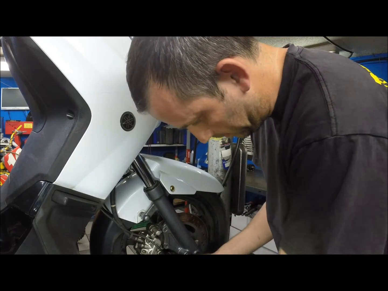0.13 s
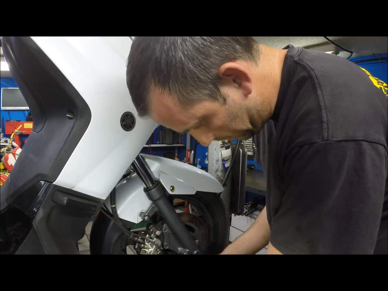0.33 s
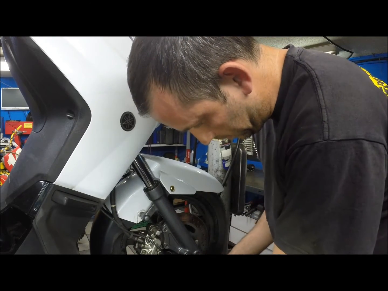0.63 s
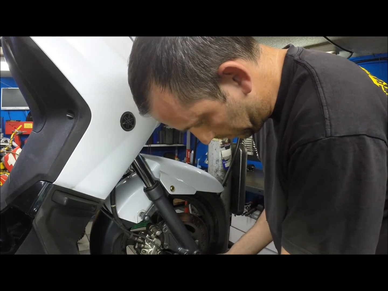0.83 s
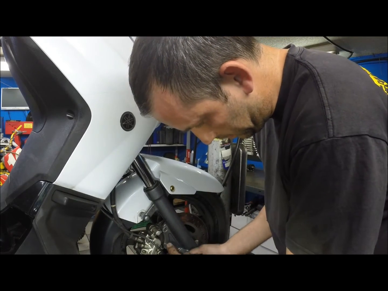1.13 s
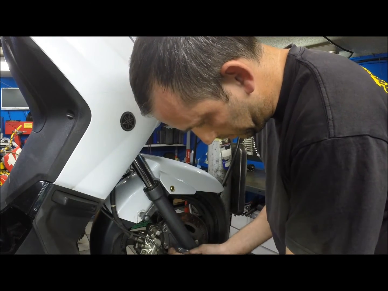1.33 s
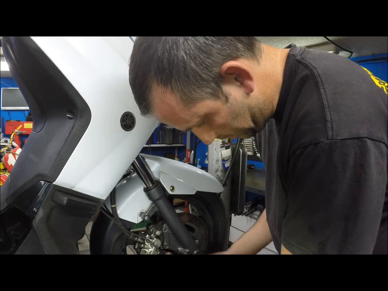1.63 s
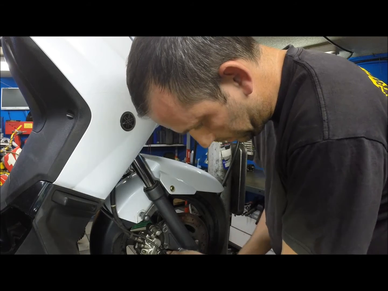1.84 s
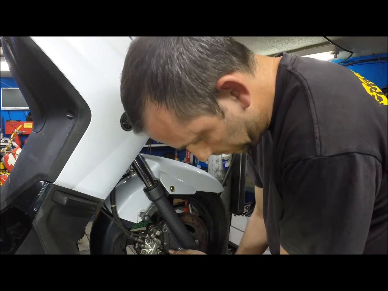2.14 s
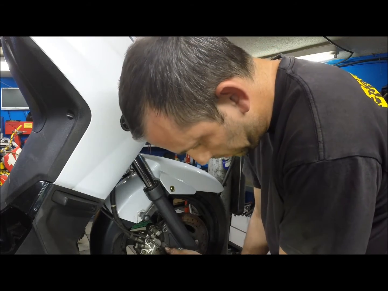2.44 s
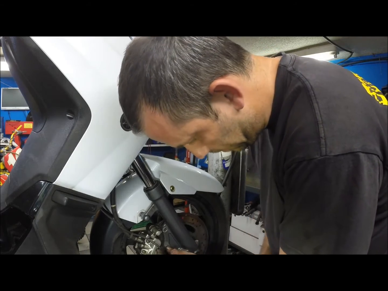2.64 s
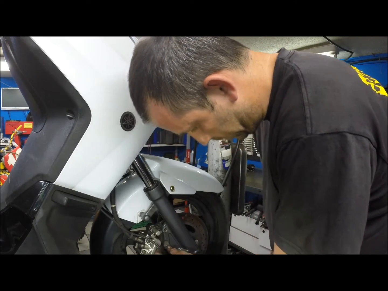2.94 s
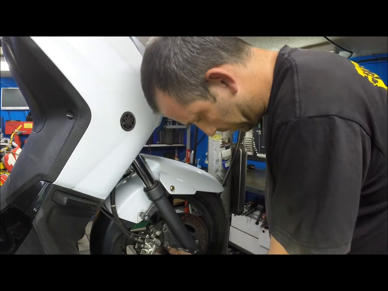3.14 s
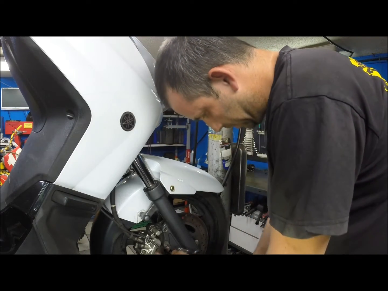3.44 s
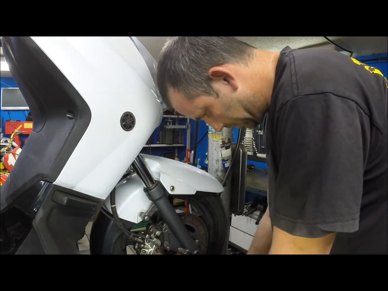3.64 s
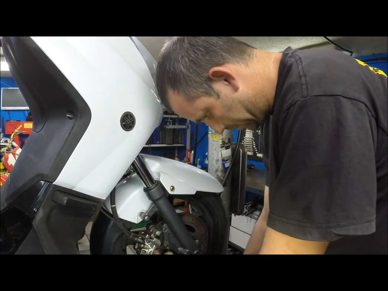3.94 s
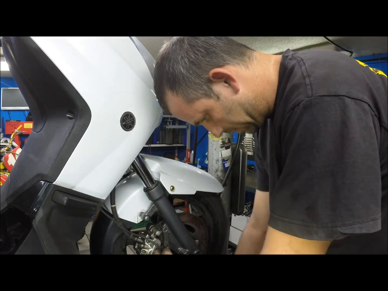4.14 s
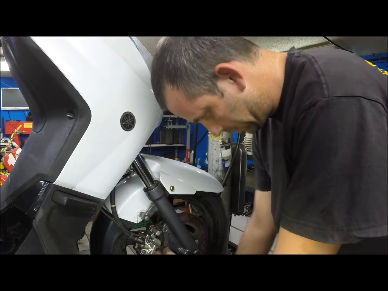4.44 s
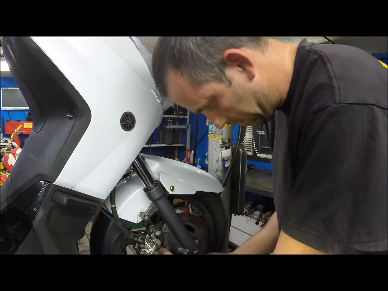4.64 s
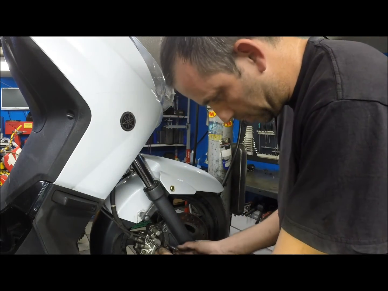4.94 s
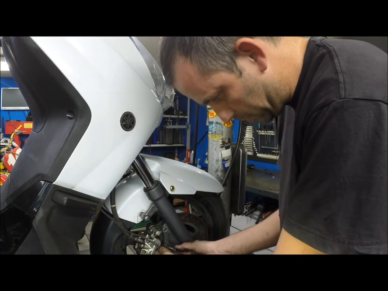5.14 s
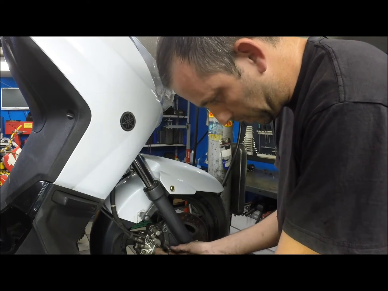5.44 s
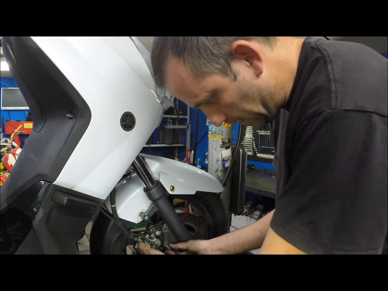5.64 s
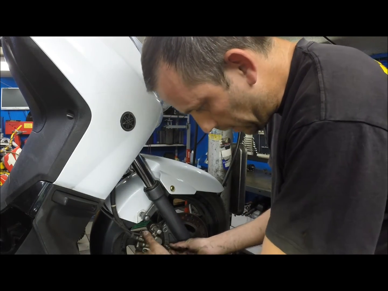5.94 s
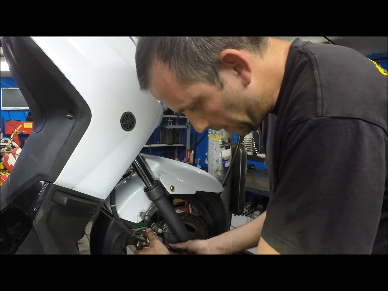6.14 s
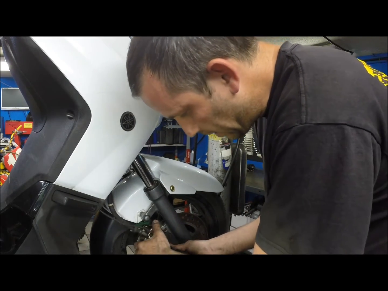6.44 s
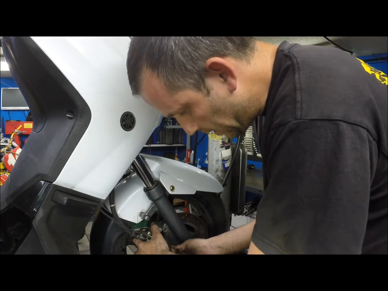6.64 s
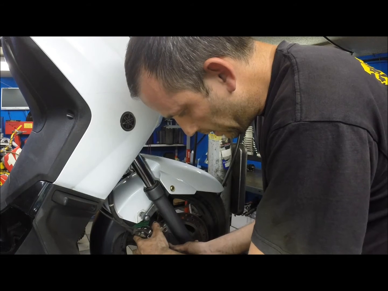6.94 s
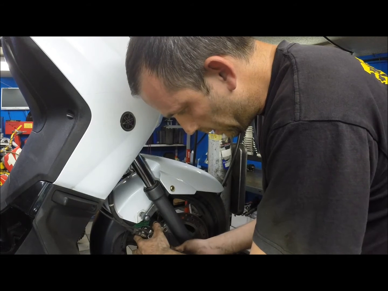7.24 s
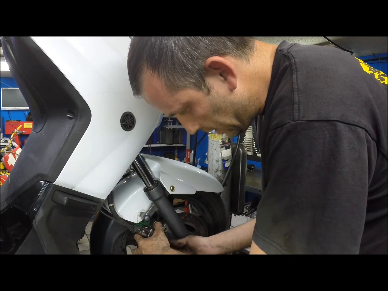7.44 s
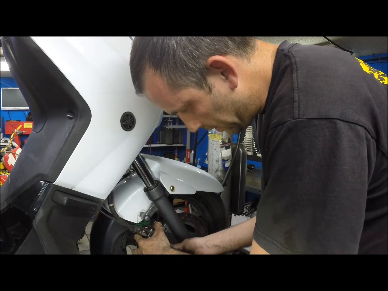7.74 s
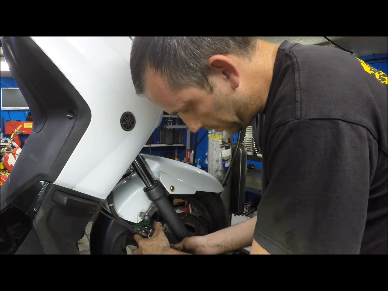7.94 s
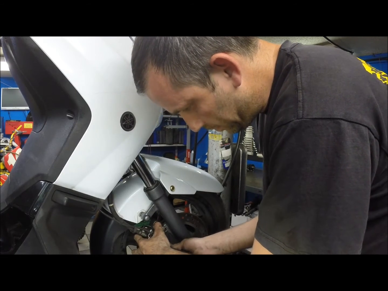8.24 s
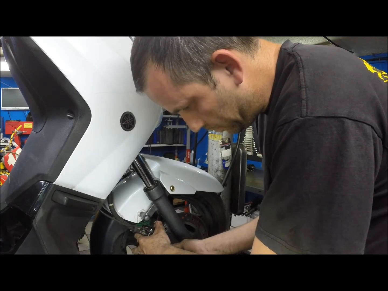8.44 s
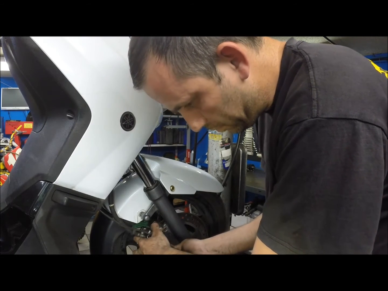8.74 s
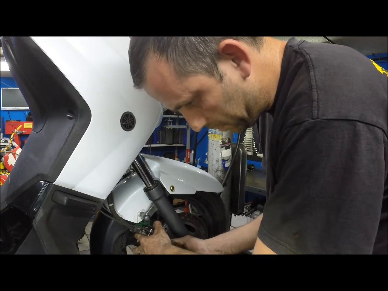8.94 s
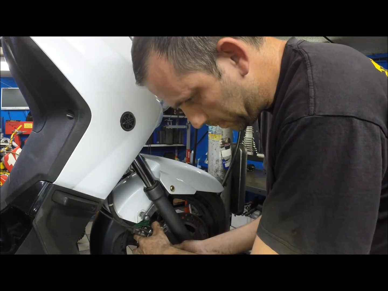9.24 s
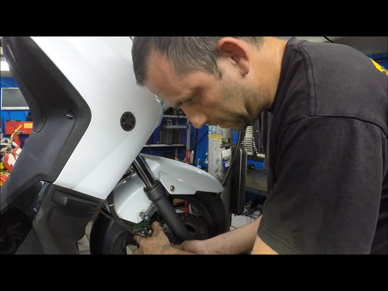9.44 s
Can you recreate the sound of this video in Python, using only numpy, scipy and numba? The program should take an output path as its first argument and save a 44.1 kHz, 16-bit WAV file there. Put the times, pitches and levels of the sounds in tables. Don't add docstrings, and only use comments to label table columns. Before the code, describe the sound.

Quiet workshop, microphone about a metre from the work, with soft room tone, faint hiss and a distant low motor hum swelling gently throughout. Barely audible taps at 0.4 and 0.9 s. At 1.5 s a bright steel ting on the brake disc, struck again just before 1.6 s, rings thin and high and is abruptly damped. Light knocks with dull wheel resonance at 1.9-2.7 s, firmer clacks at 2.9 and 3.1 s, then a pause with one faint tap at 4.5 s. From 5.2 to 5.7 s a busy run of metallic clanks, clip rattles and hollow thuds. The loudest, a heavy double clunk, lands at 6.5 s, followed by sharp knocks near 6.75 s and a softer one at 6.95 s. Small taps at 7.35 and 7.95 s; a clack at 8.7 s with a tiny scraping squeak; faint ticks around 9.4 s. Short diffuse echo follows the impacts.

```python
import sys
import numpy as np
from scipy import signal
from scipy.fft import rfft, irfft, next_fast_len
from scipy.io import wavfile
from scipy.ndimage import uniform_filter1d
from numba import njit

SR = 44100
rng = np.random.default_rng(int(sys.argv[2]) if len(sys.argv) > 2 else 0)


def ratio_of_db(decibels):
    return 10 ** (np.asarray(decibels, float) / 20)


def transcribe(signal):
    frames = np.atleast_2d(signal).T
    limited = np.clip(frames, -1, 1)
    pcm = np.round(limited * 32767).astype(np.int16)
    wavfile.write(sys.argv[1], SR, pcm)


N = 422786


def curve(table):
    s, *columns = np.transpose(table)
    return [np.interp(np.arange(N) / SR, s, column) for column in columns]


def add(out, s, sound):
    i = int(s * SR)
    out[i:i + len(sound)] += sound[:N - i]


def fade(t, t60, rise_s):
    rise = (1 - np.exp(-t / max(rise_s, 1e-5))) ** 2
    return rise * np.exp(-np.log(1000) * t / np.clip(t60, .01, 1.5))


def band(x, lo_hz, hi_hz, order=2):
    sos = signal.butter(order, [lo_hz, hi_hz], "bandpass", fs=SR, output="sos")
    y = signal.sosfilt(sos, x)
    return y / np.sqrt(np.mean(y ** 2))


def walk(rate):
    k = int(SR / rate)
    steps = np.repeat(rng.standard_normal(N // k + 1), k)
    return uniform_filter1d(uniform_filter1d(steps, k), k)[:N]


def coloured(gain_of_hz):
    size = next_fast_len(N)
    hz = np.maximum(np.fft.rfftfreq(size, 1 / SR), 1)
    y = irfft(rfft(rng.standard_normal(size)) * gain_of_hz(hz), size)[:N]
    return y / np.std(y)


@njit
def ring(pole, gain, size):
    out = np.zeros(size)
    for k in range(len(pole)):
        z = gain[k]
        for i in range(size):
            out[i] += z.imag
            z *= pole[k]
    return out


def body(t, hz, db, t60, chance, spot_db, drift):
    weight = ratio_of_db(db + spot_db * chance[0])
    weight = weight / np.sqrt(np.sum(weight ** 2))
    turn = 2j * np.pi * hz * (1 + drift * chance[1])
    decay = np.log(1000) / np.clip(t60, .03, 1.5)
    return ring(np.exp((turn - decay) / SR), weight * np.exp(3j * chance[2]), len(t))


# pitch_hz, density_db (per Hz)
FLOOR_SPECTRUM = [(12, -41), (20, -7), (80, -7), (97, -5.5), (125, -7), (160, -9), (184, -11.5), (224, -11),
                  (265, -14), (401, -16), (849, -20.5), (1030, -23), (1250, -24), (5160, -34), (15200, -47)]


def floor():
    hz, db = np.transpose(FLOOR_SPECTRUM)
    noise = coloured(lambda f: ratio_of_db(np.interp(np.log(f), np.log(hz), db)))
    low = uniform_filter1d(noise, size=81)
    high = noise - low
    return ratio_of_db(-65.5 + 4.0) * (low * ratio_of_db(1.3 * walk(2.34)) + high * ratio_of_db(.5 * walk(0.97)))


# start_s, pitch_hz
MOTOR_SPEED = [(0, 71.5), (1.1, 73.3), (2.8, 74.3), (4.6, 73.4), (5.9, 73), (6.6, 72), (7.5, 73.3),
               (8.6, 73.8), (8.95, 68.5), (9.59, 66.5)]
# start_s, level_db
MOTOR_THROB = [(0, -74), (.25, -62.5), (1.1, -59), (2.3, -61.5), (3.2, -66), (4.0, -69.5), (4.6, -72),
               (6.6, -67), (9.59, -66)]
# middle_s, length_s, level_db
HUM_SWELLS = [(0.422, 0.52, -67), (.8, 0.098, -81), (1.4, 0.94, -59), (2.373, 1.0, -55.5),
              (3.113, 0.13, -61.5), (3.524, 0.51, -64.5), (4.118, 0.34, -56.5), (4.526, 0.44, -63.5),
              (4.932, 0.19, -68), (5.19, .1, -62), (5.716, .66, -52.5), (6.19, 0.062, -66), (6.54, .3, -56),
              (6.835, 0.2, -57.5), (7.365, 0.52, -56), (7.745, 0.13, -64), (8.158, 0.34, -57),
              (8.538, 0.21, -59), (8.853, 0.15, -56), (9.15, 0.56, -64.5), (9.48, 0.14, -60.5)]


def motor():
    t = np.linspace(0, N / SR, num=N // 100)
    level = ratio_of_db(-73.5)
    for s, length_s, db in HUM_SWELLS:
        level = level + ratio_of_db(db) * np.exp(-np.abs(2 * (t - s) / length_s) ** 3.2)
    level = np.interp(np.arange(N) / SR, t, level) * ratio_of_db(0.91 * walk(16))
    speed_hz = curve(MOTOR_SPEED)[0] + 0.67 * walk(8.3)
    tone = np.sqrt(2) * level * np.sin(2 * np.pi * np.cumsum(speed_hz) / SR)
    throb = band(rng.standard_normal(N), 34.2, 40.8, order=1)
    return tone + ratio_of_db(curve(MOTOR_THROB)[0]) * throb


# low_edge_hz, high_edge_hz, t60_s, level_db
ECHO_BANDS = [(80, 560, 1, -3), (690, 1940, 0.91, -9.5), (1860, 7000, 0.93, -8.5), (4500, 22000, 0.42, -11)]


def room(x):
    t = np.arange(SR) / SR
    echo = np.zeros(SR)
    for lo_hz, hi_hz, t60, db in ECHO_BANDS:
        reflections = band(rng.standard_normal(SR), lo_hz, hi_hz) * np.sqrt((hi_hz - lo_hz) / t60)
        echo += ratio_of_db(db) * reflections * fade(t, t60, 0.0051)
    return signal.fftconvolve(x, echo * 4 / SR)[:N]


# start_s, length_s, level_db, pitch_hz
PAD_DRAGS = [(8.77, .1, -73.5, 2850), (8.77, 0.059, -72, 3230), (8.77, .08, -76, 3900),
             (8.77, .08, -73, 4700), (8.77, .05, -72, 5270), (8.775, .04, -71, 5750),
             (8.79, 0.042, -64, 1206), (8.94, .04, -77, 3100), (8.965, .065, -74, 3130),
             (8.97, .07, -81, 4700), (9.01, 0.042, -80, 3900), (8.97, .04, -79, 5750)]


def drags():
    waver_db, waver_hz = 5, 35
    out, grip, speed = np.zeros(N), ratio_of_db(waver_db * walk(200)), walk(90)
    for k, (s, length_s, db, hz) in enumerate(PAD_DRAGS):
        size = int(1.34 * length_s * SR)
        own = slice(k * SR // 2, k * SR // 2 + size)
        tone = np.sin(2 * np.pi * np.cumsum(hz + waver_hz * speed[own]) / SR)
        slide = signal.windows.tukey(size, .6)
        add(out, s - length_s / 8, ratio_of_db(db) * slide * grip[own] * tone)
    return out


# start_s, level_db, pitch_hz, t60_s
BOLT_PINGS = [(5.263, -67, 7200, 0.13), (1.53, -60, 12000, 0.11), (1.589, -55, 13430, .12),
              (5.546, -56, 4050, 0.2), (2.862, -62, 2830, 0.35), (2.861, -52.5, 1590, 0.32),
              (3.14, -55, 2377, 0.13), (5.672, -53.5, 6350, 0.14), (6.404, -66, 3750, .08),
              (6.406, -78, 4850, .2), (6.722, -65.5, 5670, 0.24), (6.811, -71, 5700, 0.13),
              (7.348, -66.5, 3800, 0.1), (5.67, -58, 2500, 0.24), (8.777, -68, 6860, 0.3),
              (5.72, -61, 4000, .4), (6.755, -59, 2800, 0.11)]
# start_s, level_db, pitch_hz, t60_s
PAD_RATTLES = [(1.528, -50, 5300, 0.085), (2.064, -59, 1440, 0.15), (2.1, -71, 7600, 0.046),
               (3.14, -61, 4300, 0.16), (8.678, -65, 3530, 0.11), (6.472, -41.5, 390, 0.25),
               (2.566, -56, 3950, 0.039), (2.86, -48, 1940, 0.19), (2.859, -62, 4500, 0.12),
               (3.14, -56, 875, 0.37), (4.5, -63, 970, .58), (4.516, -68, 3460, 0.43),
               (4.808, -58, 2600, .04), (5.263, -58.5, 4100, 0.15), (5.265, -66, 7500, .08),
               (5.382, -53.5, 7350, .076), (5.503, -64.5, 4100, .2), (5.671, -50, 4590, 0.29),
               (5.72, -49, 1680, 0.45), (5.72, -60.5, 4160, 0.4), (5.82, -52, 314, 0.27),
               (6.5, -32, 1530, 0.29), (8.678, -50.5, 735, 0.33), (8.775, -67, 5560, 0.34),
               (9.239, -56, 1450, 0.048), (9.432, -64, 1440, 0.2), (9.501, -67, 1450, 0.24),
               (5.68, -58, 3320, .3)]
# start_s, level_db, pitch_hz, t60_s
DRY_RATTLES = [(6.47, -48, 2190, .3), (6.499, -44, 2250, 0.37), (6.499, -52, 2870, .25),
               (6.499, -58, 3550, .25), (6.5, -37, 753, 0.48), (6.755, -52, 2430, 0.28),
               (5.647, -51, 2200, .35), (5.715, -52, 2200, .4), (5.546, -53, 2210, .3),
               (5.385, -54, 2240, 0.25), (5.34, -59, 2050, .4), (5.21, -56.5, 1500, .4),
               (5.21, -55.5, 700, .4), (8.68, -59.5, 2640, 0.23), (2.862, -63, 4260, .2),
               (1.528, -58, 4100, .15), (1.528, -58, 6100, .15), (1.528, -60, 8200, .15),
               (1.528, -60, 3400, .12), (1.589, -56, 7900, .05), (7.945, -62, 2800, .2),
               (7.945, -64, 3400, .25), (7.98, -62, 1400, .4), (7.34, -60, 1500, .3),
               (7.395, -60, 1450, .2), (6.946, -56, 1550, .2), (5.385, -60, 5200, .3),
               (5.67, -58, 5700, .3), (5.72, -60, 5600, .35), (8.68, -62, 3900, .25), (8.78, -66, 3600, .5),
               (9.44, -62, 1500, .4), (7.3, -60, 520, .4), (6.72, -52, 200, .5), (5.5, -62, 4000, .3)]


def ticks(pings, rattles):
    ping_width_hz, rattle_q = 110, 6.6
    out, t = np.zeros(N), np.arange(SR // 2) / SR
    rows = [(*row, ping_width_hz) for row in pings]
    rows += [(*row, row[2] / rattle_q) for row in rattles]
    for s, db, hz, t60, width_hz in rows:
        noise = rng.standard_normal(3 * SR // 5)
        rattle = band(noise, hz - width_hz / 2, hz + width_hz / 2)[-len(t):]
        add(out, s, ratio_of_db(db) * fade(t, t60, 0.00031) * rattle)
    return out


# pitch_hz, t60_s
STRIKE_TONES = [(7066, .37), (2896, .36), (3725, .19), (4780, .26), (2396, .2)]
# pitch_hz, t60_s
TOUCH_TONES = [(9324, .3), (11040, .17), (11890, .2), (12820, .15), (13430, .13)]
# pitch_hz, t60_s
BRUSHED_TONE = [(7075, .17)]
# start_s, then level_db of each of five modes
DISC_STRIKES = [
    (1.528, -31.5, -42, -68, -54, -55),
    (1.589, -41, -80, -51, -70, -80),
]
# start_s, first_tone_db, second_and_fourth_db, third_and_fifth_db
DISC_TOUCHES = [(1.5284, -57, -64, -53), (1.588, -49, -47.5, -53), (2.5677, -83, -84, -80),
                (5.3852, -64, -79, -80), (5.5463, -70, -67, -63), (5.6704, -65, -83, -63),
                (6.4044, -68, -96, -90), (6.498, -71, -90, -71), (8.6784, -82, -91, -79)]
# start_s, level_db, free_ringing_s
DISC_BRUSHES = [(1.3518, -72, 0.033), (2.5672, -69, 0.04), (2.86, -78, 0.036), (5.544, -44.5, 0.021),
                (5.6695, -56, 0.035), (6.4058, -59, 0.062), (6.4984, -63, 0.047), (6.5144, -58, 0.044),
                (6.7694, -69, 0.038), (7.265, -77, 0.036), (7.3474, -69, 0.056), (7.9424, -71, 0.043),
                (8.0314, -79, 0.023), (8.678, -61, 0.031), (8.776, -72, 0.049), (9.47, -75, 0.052)]
RETOUCHES = (1.5545, 1.5885)


def disc():
    hand_damps_s, fifth_tone_db, retouch_turns = 1.622, -12, .13
    out, t = np.zeros(N), np.arange(SR // 3) / SR
    touches = [(row[0], STRIKE_TONES, row[1:], hand_damps_s - row[0]) for row in DISC_STRIKES]
    touches += [(s, BRUSHED_TONE, [db], free_s) for s, db, free_s in DISC_BRUSHES]
    touches += [(s, TOUCH_TONES, (a, b, c, b, c + fifth_tone_db), .03) for s, a, b, c in DISC_TOUCHES]
    flutter = ratio_of_db(5.0 * walk(90))
    for s, tones, levels_db, free_s in touches:
        free = np.exp(-np.maximum(t - free_s, 0) / 0.00091)
        now = t + int(s * SR) / SR
        for k, ((hz, t60), db) in enumerate(zip(tones, levels_db)):
            strongest_struck = tones is STRIKE_TONES and k == 0
            contact = flutter[int(s * SR / 2) + k * SR:][:len(t)]
            held = (.14 if strongest_struck else .35) * contact
            slip = retouch_turns * sum(now > r for r in RETOUCHES) * strongest_struck
            tone = np.sin(2 * np.pi * (hz * now + slip))
            grip = contact if tones is BRUSHED_TONE else 1
            level = free * grip + (1 - free) * held
            add(out, s, ratio_of_db(db) * level * fade(t, t60, 0.000067) * tone)
    return out


# start_s, level_db, pitch_hz, t60_s
BLOW_MODES = [(1.5275, -43, 5300, .012), (1.527, -45, 4000, .012), (1.5278, -52, 6070, .015),
              (1.555, -56, 1560, 0.11), (5.646, -37, 1485, .1), (5.647, -45, 2450, 0.064),
              (5.6527, -38, 1590, .07), (5.67, -45, 4700, 0.046), (5.67, -47, 6800, .03),
              (5.715, -41, 1450, .1), (5.721, -39, 1793, 0.08), (5.715, -54, 2850, .06),
              (6.47, -26, 1450, 0.078), (6.473, -31, 1190, 0.16), (6.5, -23, 1460, 0.052),
              (6.503, -28, 930, 0.16), (6.506, -31, 1177, 0.22), (6.506, -25.5, 550, 0.085),
              (6.51, -35, 1739, .12), (6.57, -41, 500, 0.17), (6.722, -41, 703, 0.11),
              (6.755, -50, 1936, 0.14), (8.68, -46, 1450, .1), (2.862, -53, 2100, .1),
              (5.507, -46, 560, .12), (8.68, -47, 2170, 0.07), (8.685, -49, 760, 0.27),
              (8.679, -57, 3230, .07), (8.679, -64, 4300, .06), (2.064, -56, 1400, .1),
              (2.066, -56, 780, .15), (7.945, -54, 1200, .08), (3.17, -56, 535, .3),
              (6.505, -72, 12820, .25), (6.52, -76, 13430, .15), (1.918, -60, 540, .12),
              (.434, -60, 700, .08), (2.668, -60, 2000, .08), (1.6215, -52, 7300, .012)]


def blows():
    out, t = np.zeros(N), np.arange(SR // 3) / SR
    for s, db, hz, t60 in BLOW_MODES:
        add(out, s, ratio_of_db(db) * fade(t, t60, 0.00028) * np.sin(2 * np.pi * hz * t))
    return out


# pitch_ratio, level_db
WHEEL_MODES = [(1.002, -1.5), (0.858, -21), (0.931, -9), (1.039, -8), (1.117, -9.5), (1.24, -11),
               (1.38, -12.5)]
# start_s, thud_db, pitch_hz, boom_db
WHEEL_THUDS = [(0.434, -57, 539, -80), (0.9, -60, 529, -79), (1.917, -59, 531, -62.5),
               (2.064, -51, 657, -63), (2.475, -51.5, 631, -59.5), (2.674, -50.5, 654, -60),
               (2.863, -39, 544.5, -60), (3.143, -45, 529, -65), (4.498, -60, 530, -65.5),
               (5.207, -47.5, 537.5, -75), (5.264, -51.5, 541, -68), (5.395, -38, 540, -60.5),
               (5.507, -42, 545, -58.5), (5.553, -36.5, 531.5, -75), (5.65, -37, 637, -48.5),
               (5.67, -37.5, 611, -46), (5.714, -37.5, 595.5, -61.5), (6.472, -32.5, 600, -43),
               (6.484, -30, 470.4, -47), (6.49, -27, 495, -37), (6.725, -40.5, 638, -46),
               (6.753, -38.5, 526, -54.5), (6.946, -46, 667.5, -49.5), (7.36, -53, 516, -59),
               (7.403, -50.5, 528, -60.5), (7.956, -42, 540.6, -55), (8.032, -46.5, 530.4, -70),
               (8.681, -49.5, 523, -53.5), (8.846, -49.5, 508, -56.5), (9.436, -48.5, 538, -66)]


def thuds():
    wheel_hz, wheel_t60_s = 535, 0.36
    out, t = np.zeros(N), np.arange(SR // 3) / SR
    boom = band(rng.standard_normal(N), 130, 740) + 0.58 * band(rng.standard_normal(N), 211.5, 281)
    ratio, db = np.transpose(WHEEL_MODES)
    chance = rng.standard_normal((len(WHEEL_THUDS), 3, len(WHEEL_MODES)))
    chance[:, :2, 0] = 0
    for (s, thud_db, hz, boom_db), c in zip(WHEEL_THUDS, chance):
        t60 = wheel_t60_s * (wheel_hz / hz) ** 1.3
        modes = body(t, hz * ratio, db, t60 + 0 * ratio, c, spot_db=1.0, drift=0.01555)
        thud = modes * fade(t, 3.7, 0.0016)
        rumble = boom[int(.9 * s * SR):][:len(t)] * fade(t, 1.39 * t60, 0.0063)
        add(out, s - .003, ratio_of_db(thud_db) * thud + ratio_of_db(boom_db - 2) * rumble)
    return out


# pitch_hz, level_db, t60_s
FORK_MODES = [(877, -13, 0.14), (946, 3, 0.18), (1077, 7, 0.25), (1190, -5, 0.51), (1330, -23, 5.0),
              (1411, 21.5, 0.096), (1490, -16, 0.64), (1600, 2, 0.13), (1686, -1.5, 0.31), (1890, -13, 0.8),
              (1790, -30, 0.31), (1916, -1, 0.17), (2020, 18, 0.065), (2020, -2, 0.091), (2330, -31, 0.2),
              (2080, -19, 0.085), (2600, -23, 0.16), (2340, -52, 0.38)]
# pitch_hz, width_hz, level_db
CRACK_BANDS = [(2770, 660, 0), (3400, 950, -3.5), (3950, 790, -2.5), (4880, 1050, -6.5), (5720, 920, -10)]
# start_s, lower_clank_db, upper_clank_db, crack_db
FORK_KNOCKS = [(1.477, -61.5, -70, -63), (1.527, -65, -81, -51), (1.554, -66, -75, -62),
               (1.916, -71, -67, -64), (2.062, -62, -56, -60), (2.474, -78, -68, -73),
               (2.667, -73, -58, -72), (2.857, -51.5, -57, -51.5), (3.138, -73, -53, -50),
               (4.497, -63, -60, -73), (5.2, -55.5, -57, -72), (5.339, -63, -56, -68),
               (5.353, -60, -55, -59), (5.368, -60, -51, -47), (5.381, -46.5, -46, -56),
               (5.499, -59, -56.5, -61), (5.542, -45.5, -45, -43.5), (5.646, -42, -38, -47),
               (5.67, -40, -60, -42.5), (5.713, -45.5, -43, -41.5), (2.565, -64.5, -66, -60),
               (6.406, -58, -57, -58), (6.47, -34, -38, -50), (6.498, -28, -35, -43),
               (6.754, -43, -43, -39.5), (6.945, -54.5, -54.5, -69), (8.033, -65, -63, -73),
               (8.678, -48.5, -49.5, -52.5), (8.775, -63, -73, -67), (7.942, -53.5, -55.5, -55.5)]
# start_s, lower_clank_db, upper_clank_db, crack_db
FORK_SCUFFS = [(0.433, -73, -85, -64), (0.94, -65, -80, -81), (1.346, -63, -66.5, -78),
               (5.922, -84, -60, -60.5), (4.517, -56.5, -61, -57), (5.263, -58, -58, -67),
               (6.02, -61, -63, -76), (6.72, -58, -58, -54), (7.347, -56.5, -60, -60.5),
               (7.4, -73, -80, -82), (8.975, -62.5, -78, -65), (8.791, -56, -63, -55.5),
               (8.845, -62, -70, -70), (9.432, -63, -67, -78), (9.5, -63, -68, -75)]
# start_s, level_db
STEEL_SNAPS = [(1.527, -56), (1.554, -70), (1.589, -46), (1.621, -65), (2.565, -60.5), (3.138, -66),
               (5.263, -67), (5.382, -50), (5.542, -53), (5.67, -51), (5.712, -55), (6.498, -72),
               (6.719, -66), (6.7545, -51), (8.776, -64), (8.792, -61)]


def knocks():
    out, t = np.zeros(N), np.arange(SR // 3) / SR
    crack = np.zeros(N)
    for hz, width_hz, db in CRACK_BANDS:
        crack += 0.57 * ratio_of_db(db) * band(rng.standard_normal(N), hz - width_hz / 2, hz + width_hz / 2)
    air = band(rng.standard_normal(N), 6200, 10600)
    grit_low = band(rng.standard_normal(N), 670, 1340, order=3)
    grit_high = band(rng.standard_normal(N), 1573, 2136)
    hz, db, own_t60 = np.transpose(FORK_MODES)
    low = hz < 1350
    spike = fade(t, 0.023, 0.00045)
    puff = 0.65 * fade(t, 0.02, 0.00066) + 0.42 * fade(t, 0.13, 0.0021)
    for s, air_db in STEEL_SNAPS:
        add(out, s, ratio_of_db(air_db - 2.0) * air[int(.8 * s * SR):][:len(t)] * puff)
    rows = [(*row, 0.23, 0) for row in FORK_KNOCKS] + [(*row, 0.39, 0.0051) for row in FORK_SCUFFS]
    chance = rng.standard_normal((len(rows), 3, len(FORK_MODES)))
    for (s, low_db, high_db, crack_db, t60, slide_s), c in zip(rows, chance):
        spot = slice(int(.9 * s * SR), int(.9 * s * SR) + len(t))
        life = t60 * np.clip(own_t60 / 0.5, .7, 1.3) * (1400 / hz) ** 0.24
        lightness = np.clip((-49 - max(low_db, high_db)) / 15, 0, 1)
        rise_s = slide_s + 0.00027 + 0.0012 * lightness
        strike, loose = fade(t, 0.27, rise_s), .5 * fade(t, 1.43 * t60, rise_s)
        sound = 0
        for part, part_db, grit in ((low, low_db, grit_low), (~low, high_db, grit_high)):
            modes = body(t, hz[part], 0.39 * db[part], life[part], c[:, part], spot_db=3.0, drift=0.012)
            sound = sound + ratio_of_db(part_db + 2.5) * (modes * strike + grit[spot] * loose)
        contact = .7 * spike + 0.25 * fade(t, 1.32 * t60, 0.0018)
        sound = sound + ratio_of_db(crack_db + 2.0) * crack[spot] * contact
        add(out, s, sound + ratio_of_db(crack_db - 25) * air[spot] * puff)
    return out


def scene():
    fork = knocks() + thuds() + blows()
    steel, parts = disc(), ticks(BOLT_PINGS, PAD_RATTLES)
    echo = room(fork + parts + ratio_of_db(-12) * steel)
    mono = fork + steel + parts + echo + motor() + floor() + drags() + ticks([], DRY_RATTLES)
    return np.array([mono, mono])


def top_cut(x):
    return signal.sosfilt(signal.butter(12, 15390, fs=SR, output="sos"), x)


def record(dry):
    late = np.roll(dry[0], 331)
    hiss = ratio_of_db(-91 + 1.6 * walk(20)) * coloured(lambda f: (f + 12) ** -.7 + 0.0024)
    trace = hiss + ratio_of_db(-41.0) * late + ratio_of_db(-24.5) * np.gradient(late)
    both = dry + trace * np.array([[1], [-1]])
    low_pass = signal.ellip(8, .2, 60, 15230, fs=SR, output="sos")
    return top_cut(signal.sosfilt(low_pass, both))


dry = scene()
out = record(dry)
transcribe(out)
```